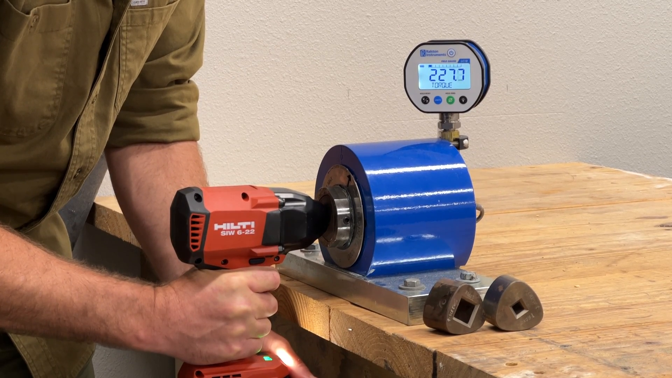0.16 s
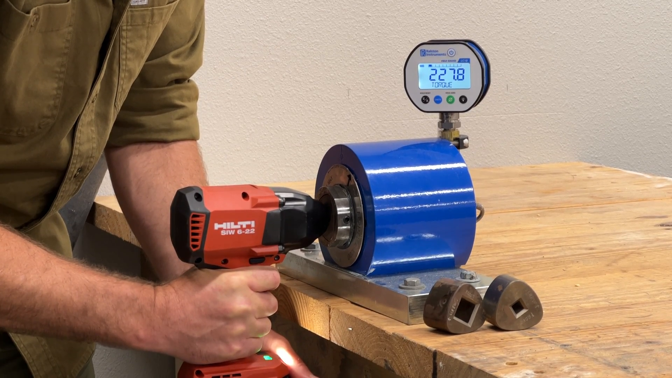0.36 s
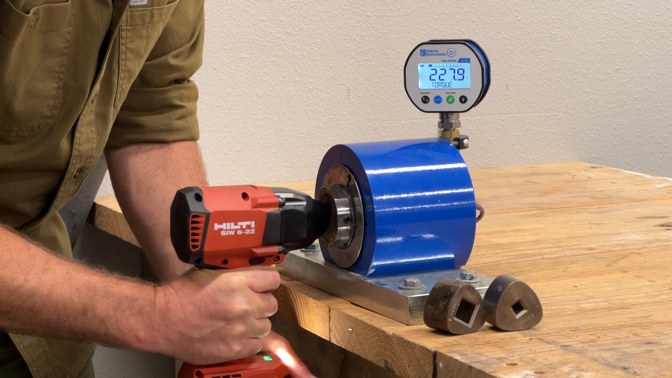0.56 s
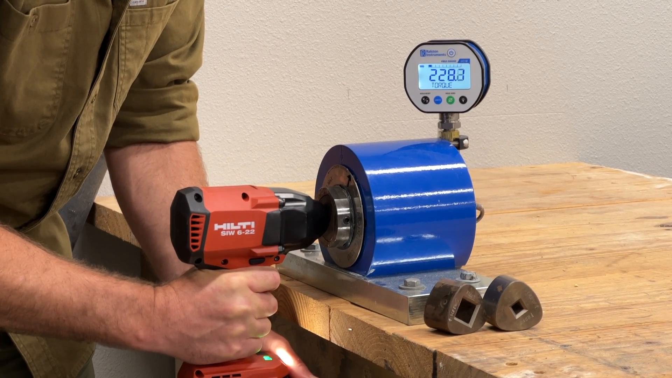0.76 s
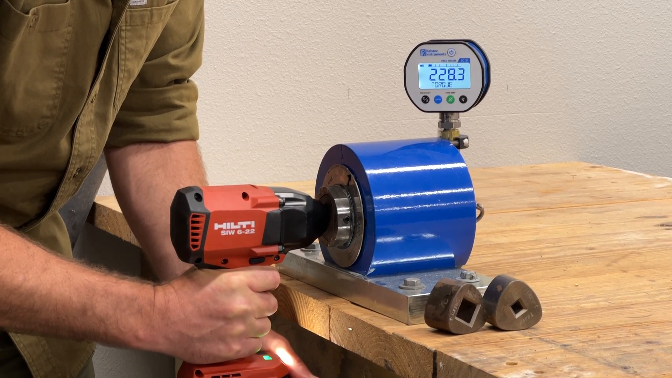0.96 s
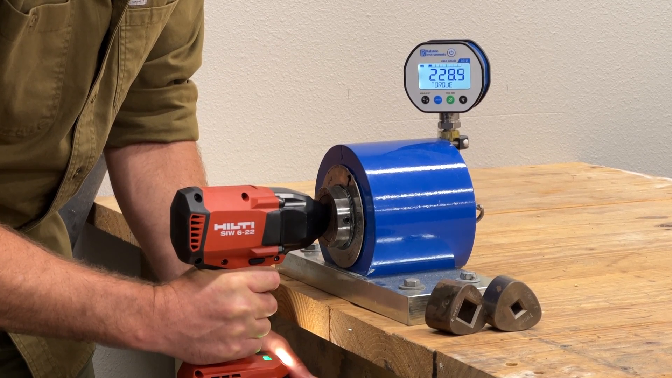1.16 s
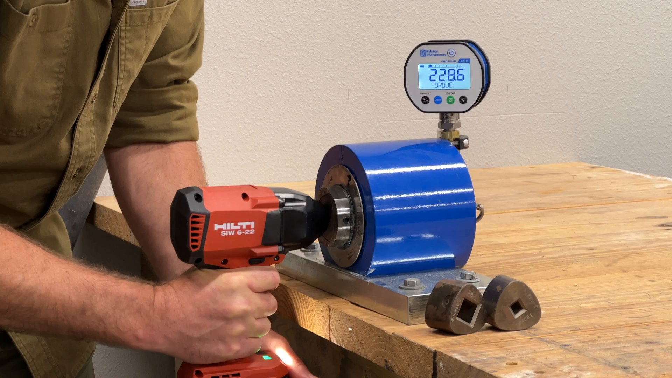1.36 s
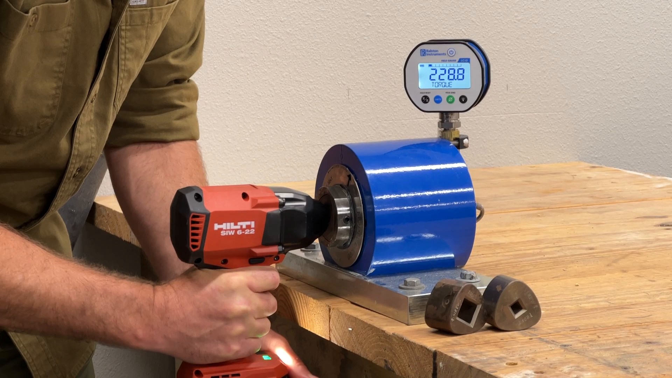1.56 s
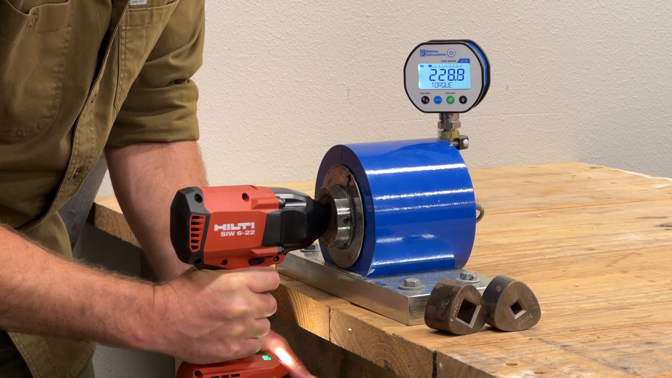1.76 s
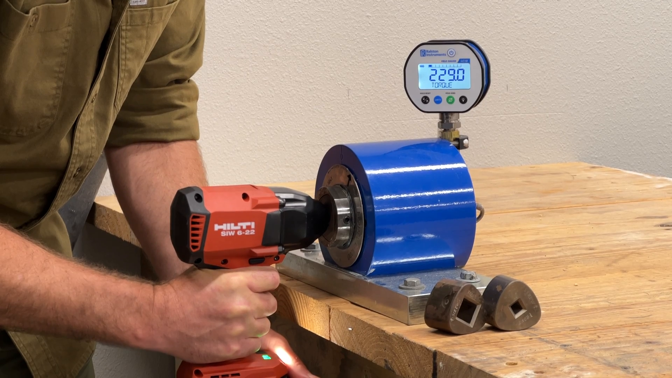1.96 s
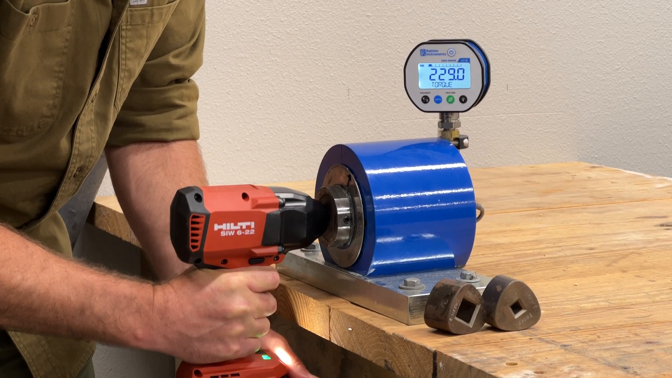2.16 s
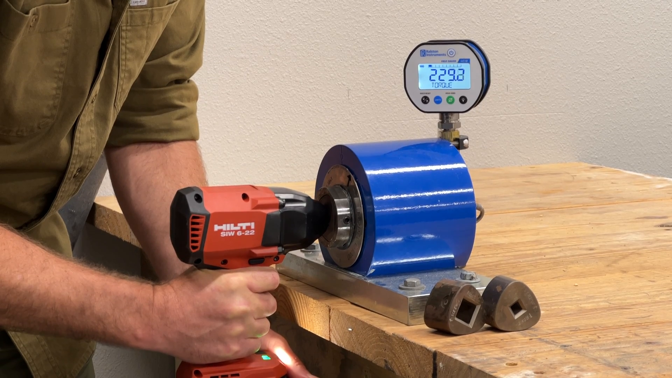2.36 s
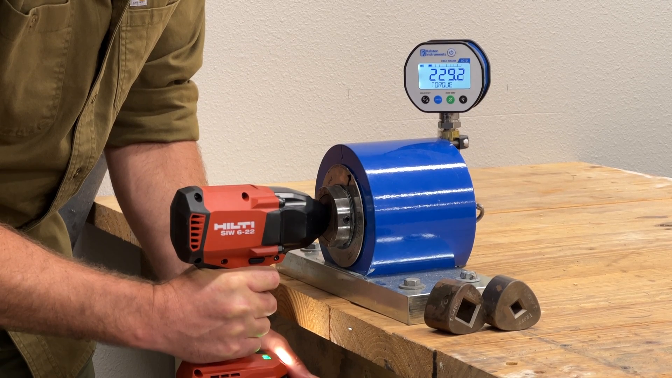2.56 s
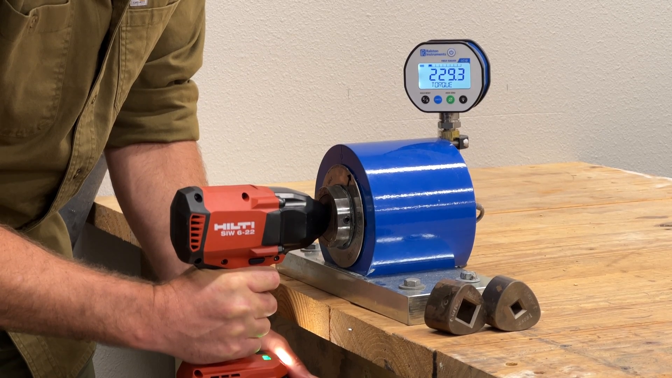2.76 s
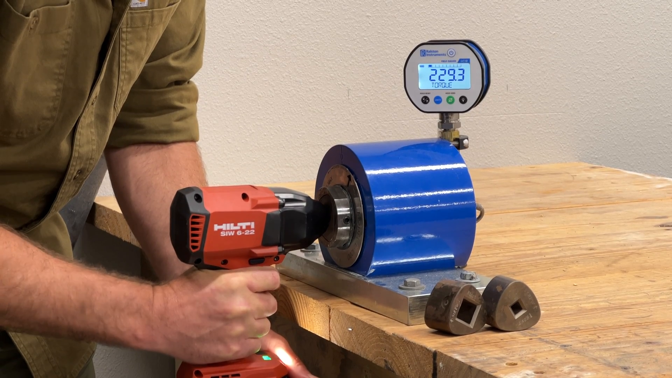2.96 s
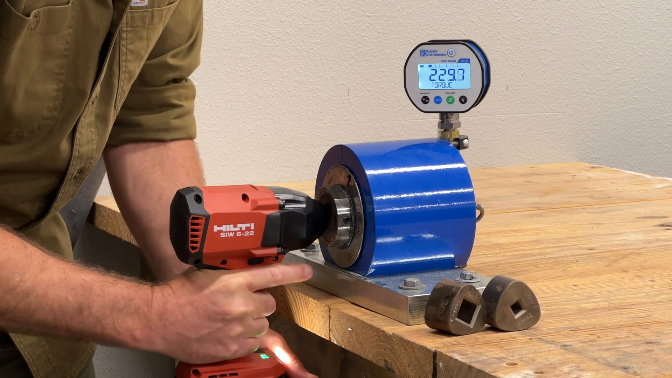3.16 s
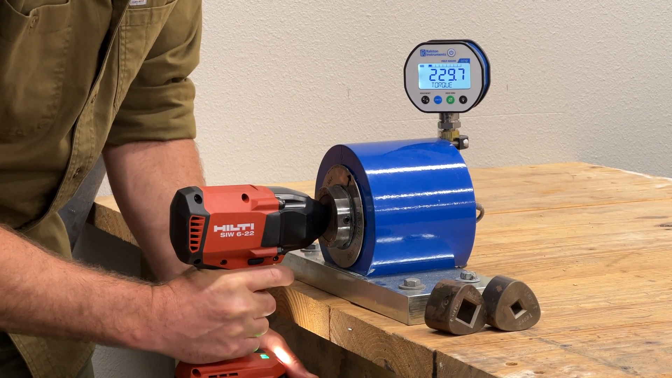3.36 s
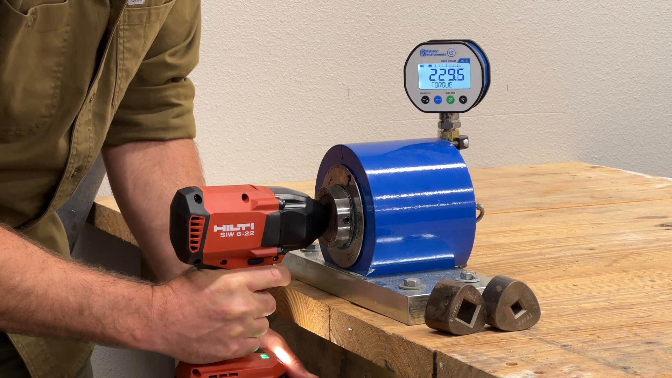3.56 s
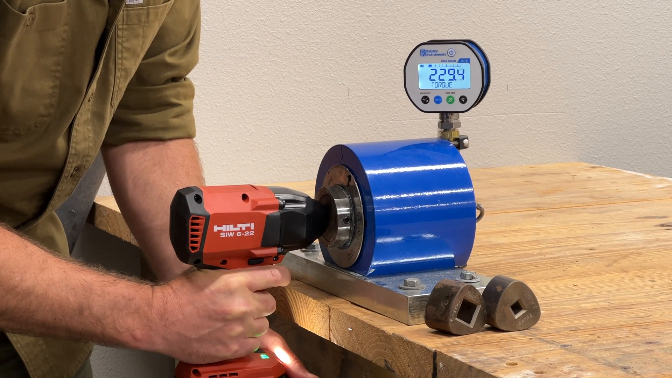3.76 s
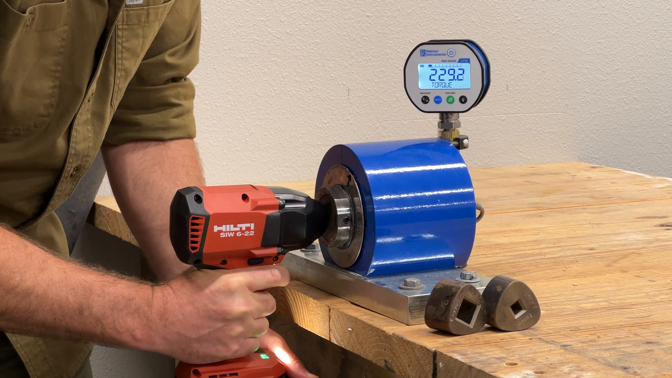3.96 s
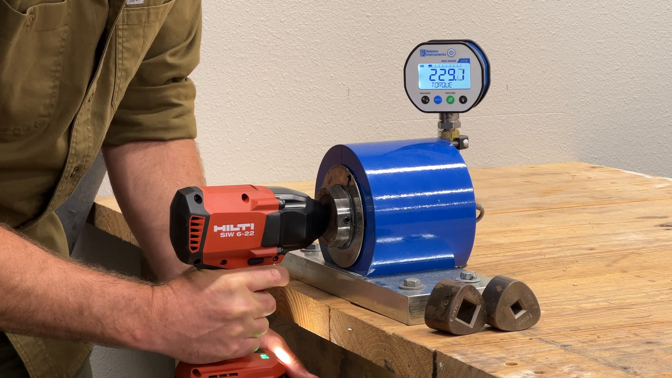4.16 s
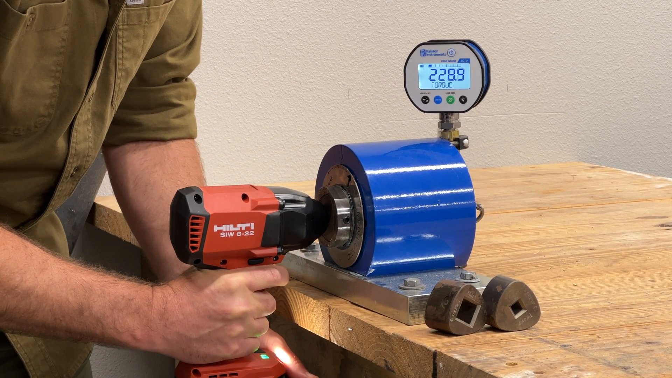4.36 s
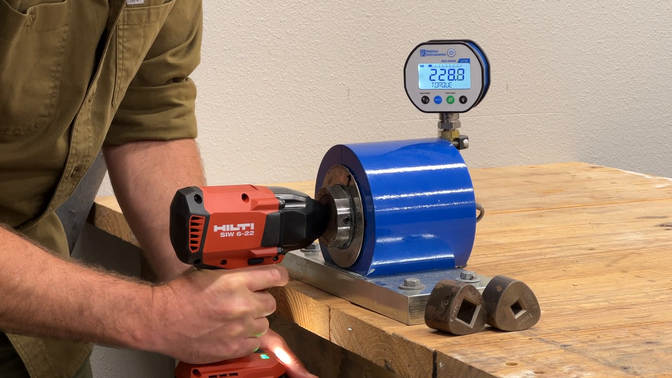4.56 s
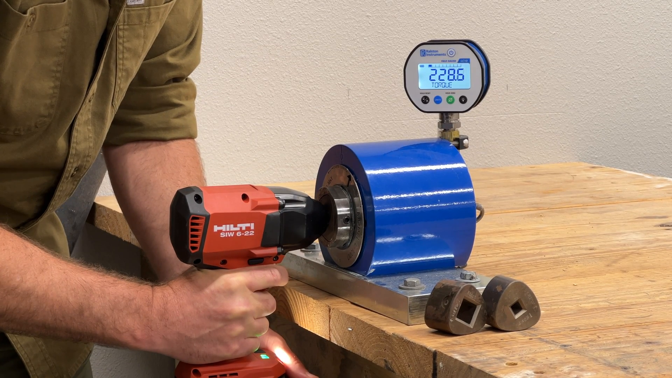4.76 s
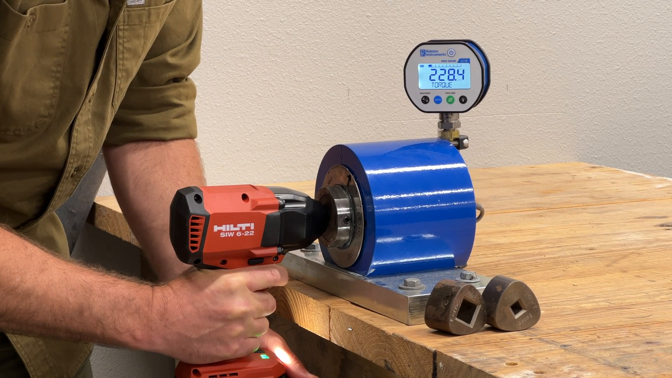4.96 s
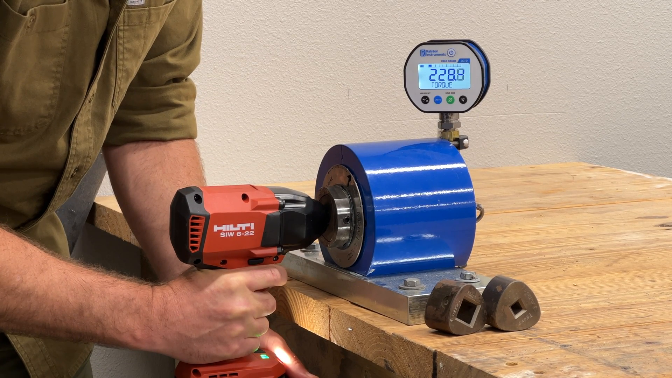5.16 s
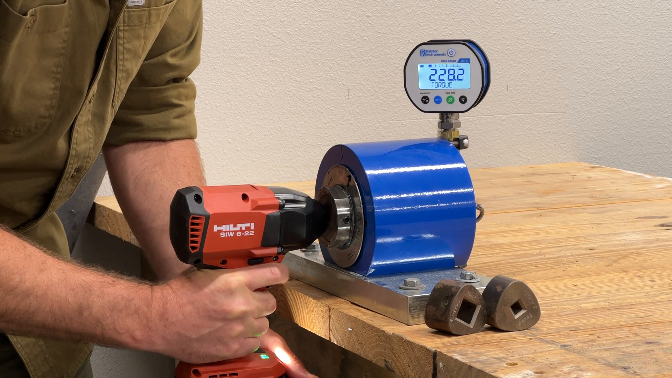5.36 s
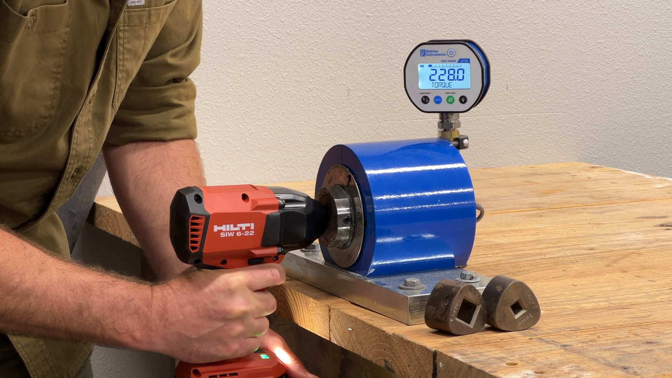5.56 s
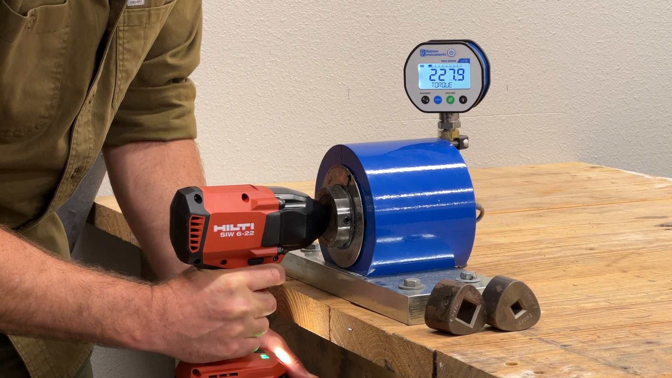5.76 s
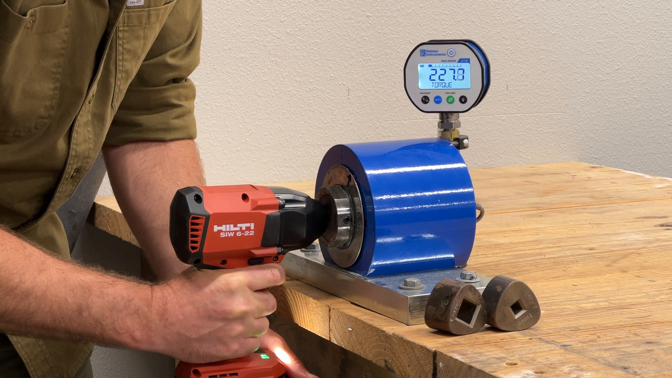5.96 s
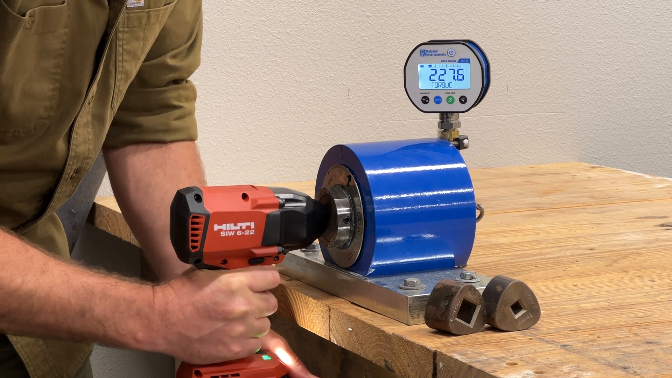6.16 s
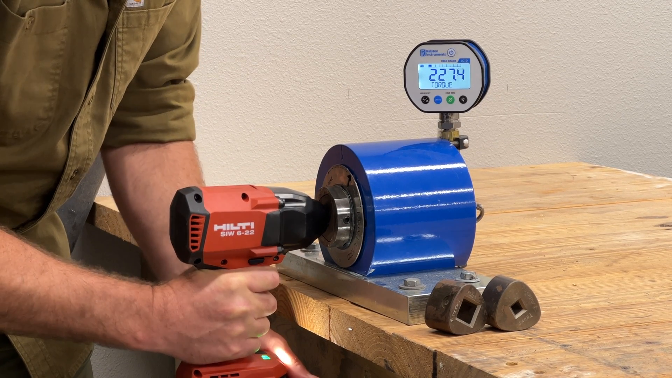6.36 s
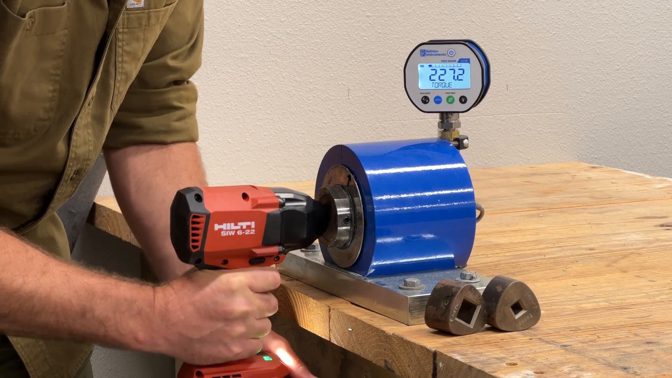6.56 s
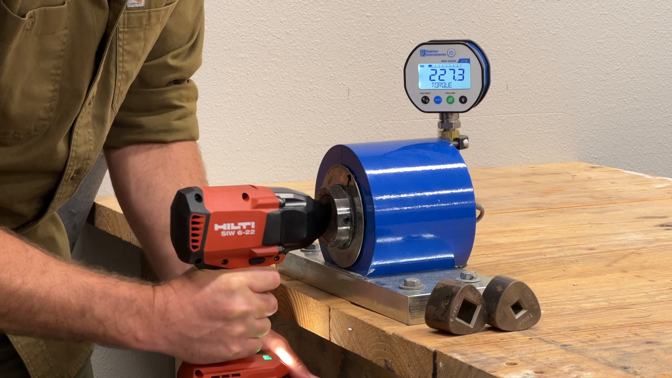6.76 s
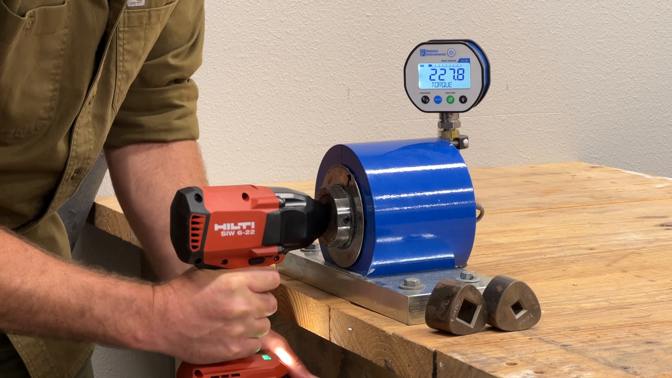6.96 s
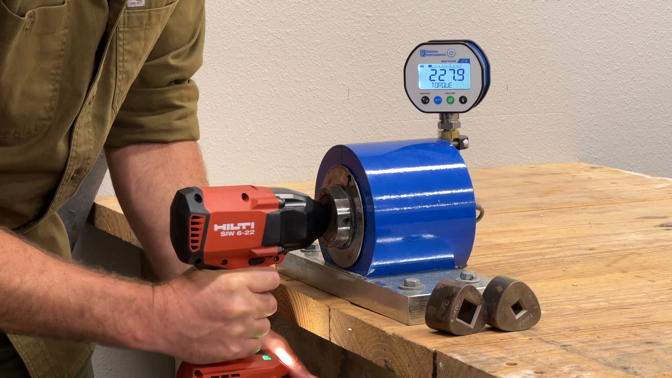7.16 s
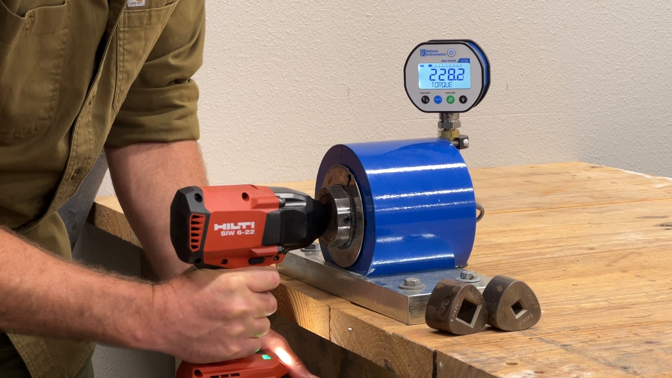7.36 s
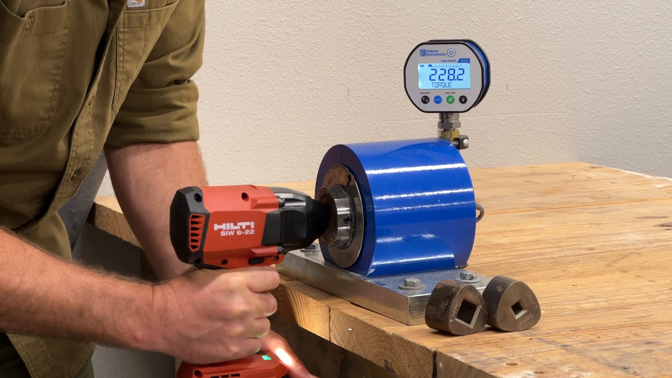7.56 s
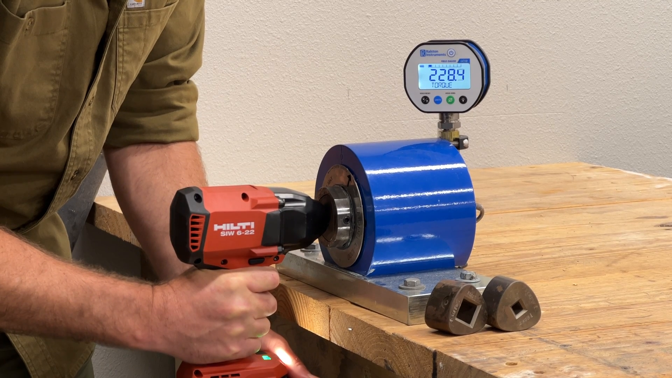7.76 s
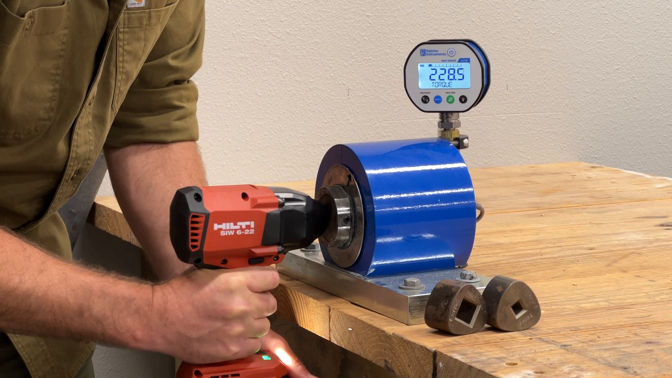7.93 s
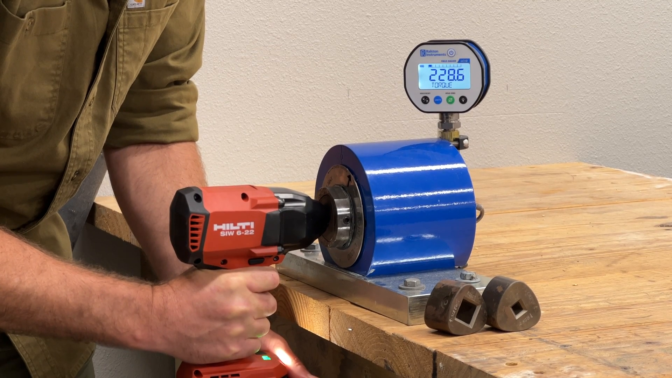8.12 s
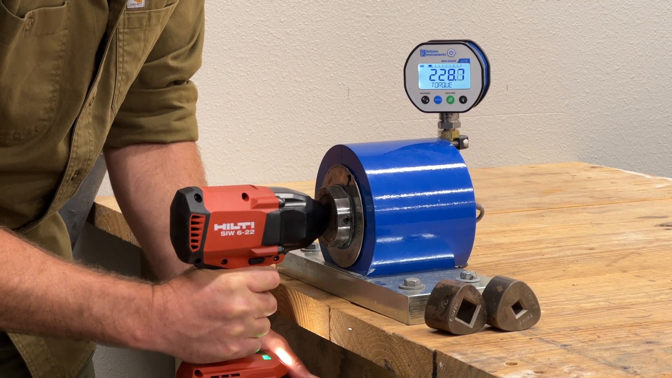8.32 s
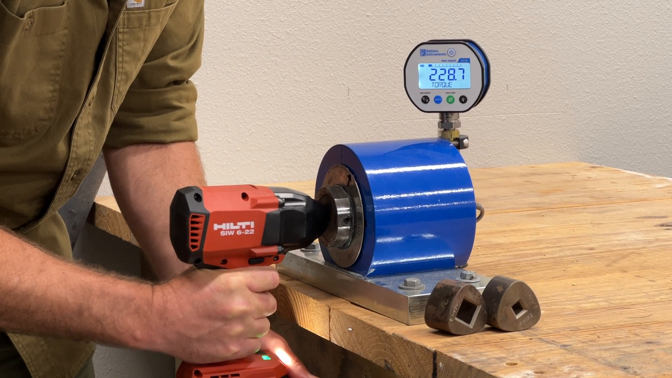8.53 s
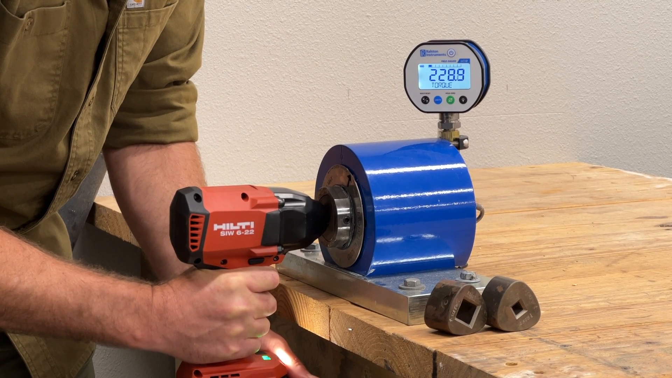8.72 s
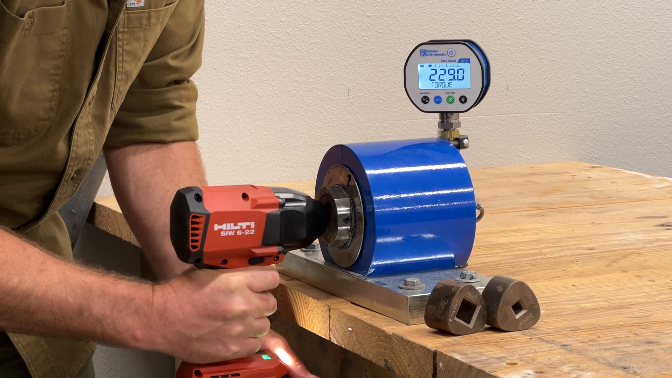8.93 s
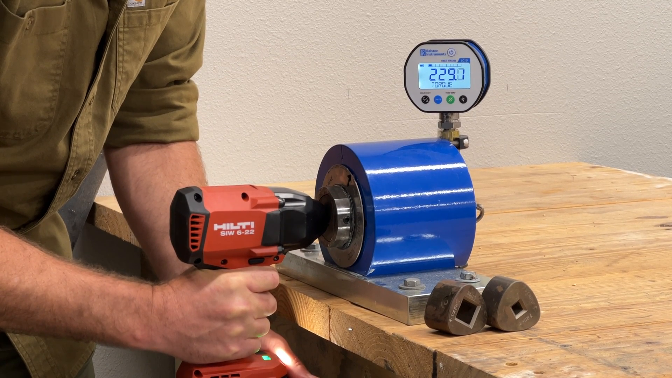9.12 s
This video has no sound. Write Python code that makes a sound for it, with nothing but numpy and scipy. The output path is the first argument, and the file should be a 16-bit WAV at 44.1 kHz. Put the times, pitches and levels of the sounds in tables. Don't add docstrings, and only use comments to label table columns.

```python
import sys
import numpy as np
from scipy import signal
from scipy.fft import rfft, irfft, next_fast_len
from scipy.io import wavfile
from scipy.ndimage import uniform_filter1d

SR = 44100
rng = np.random.default_rng(int(sys.argv[2]) if len(sys.argv) > 2 else 0)


def boost_factor(decibels):
    exponent = np.asarray(decibels, float) / 20
    return 10 ** exponent


def output_pcm(signal):
    pcm = np.clip(np.atleast_2d(signal).T, -1, 1) * 32767
    wavfile.write(sys.argv[1], SR, np.round(pcm).astype(np.int16))


N = 409688
FULL_RATE_HZ = 56.8
BRAKE_S, STALL_SHARE = .25, .32

# first counted blow in seconds, pulled in seconds, released in seconds,
# rate in blows per second, battery sag in blows per second per second.
BURSTS = [
    (-.0459, -1, 2.981, 56.835, .014),
    (6.1003, 6.1, 9.6, 56.986, .101),
]
# start in seconds, peak in dB,
# brightness in dB per octave, hall share in dB, ring in Hz.
CLICKS = [(3.5449, -62, 3, 6, 7000), (3.7674, -53, -5, 8, 6000), (3.797, -52.5, -4.5, 14, 3500),
          (4.231, -40, -5.5, -6, 1430), (4.2318, -46, -2.5, 4, 3300), (4.2414, -41, -7.5, 6.5, 3600),
          (4.251, -51, -4, -5, 700), (4.309, -47, -6, -2, 3800), (5.1374, -65, -3, 1, 2500),
          (6.022, -59, -3, 5, 2000), (6.0346, -34, -4, 1, 5900), (6.037, -44, -5, 15, 2900),
          (6.0436, -48, -1, -3, 9000), (6.064, -26.5, -4, 5, 2670), (6.0752, -23, -7, 5.5, 2060),
          (6.0894, -45, -4, 24.5, 1180)]


def evened(x):
    return x / np.sqrt(np.mean(x ** 2) + 1e-30)


def read(points, hz):
    f, value = np.transpose(points)
    return np.interp(np.log(hz + 1), np.log(f + 1), value)


def curve(rows, column):
    rows = np.asarray(rows)
    return np.interp(np.arange(N) / SR, rows[:, 0], rows[:, column])


def causal(gain_db):
    log_gain = np.maximum(gain_db, -100) * np.log(10) / 20
    full = np.r_[log_gain, log_gain[-2:0:-1]]
    spectrum = np.exp(np.conj(signal.hilbert(full)))
    taps = np.fft.ifft(spectrum).real[:len(gain_db)]
    return taps / np.linalg.norm(taps)


def mode(x, hz, width):
    pole = np.exp((2j * hz - width) * np.pi / SR)
    return 2 * signal.lfilter([1 - abs(pole)], [1, -pole], x).real


def train(times, sizes, size=0):
    at = np.round(times * SR).astype(int) + size
    keep = (at >= 0) & (at < N + size)
    return np.bincount(at[keep], sizes[keep], N + size)


def motor(t, burst):
    first, pulled, released = burst[:3]
    catch = 1 - .35 * np.exp(-np.maximum(t - pulled, 0) / .03)
    return catch * np.clip(1 - (t - released) / BRAKE_S, STALL_SHARE, 1)


def braking(t):
    return np.clip((t - BURSTS[0][2]) / BRAKE_S, 0, 1) * (t < BURSTS[1][0])


def force(t):
    first = t < BURSTS[1][0] - 1
    share = np.where(first, motor(t, BURSTS[0]), motor(t, BURSTS[1]))
    since = np.maximum(t - np.where(first, BURSTS[0][1], BURSTS[1][1]), 0)
    tightening_db = 0.04 * (since - 2)
    slow_db = 2 * np.minimum(2 * (1 - share), 1)
    seating_db = -3 * np.exp(-since / 0.28)
    return -37.5 + tightening_db + slow_db, -39 + 12 * np.log10(share) + seating_db


def blow_times(place):
    times, numbers = [], []
    for burst in BURSTS:
        first, _, released, rate, sag = burst
        last = min(released + BRAKE_S * (1 - STALL_SHARE), N / SR + .01)
        s = np.arange(first, last, 1e-4)
        blows_per_s = (rate - sag * (s - first)) * motor(s, burst)
        count = 1 + np.cumsum(blows_per_s) * 1e-4
        number = np.arange(1, count[-1] - place)
        times.append(np.interp(number + place, count, s))
        numbers.append(number)
    return np.concatenate(times), np.concatenate(numbers)


def cracks(spread_db=0.0, snap=3.3, chatter_db=-14, chatter_per_s=900):
    # place in the cycle from 0 to 1, level in dB,
    # timing scatter in ms, level change in dB while braking to a stop.
    rattle = [
        (0, 4, 0.12, -17.5),
        (.18, 5, .25, -3),
        (.3, 1.5, .2, 1),
        (0.438, 1.5, 0.45, -7),
        (.65, 0.5, .4, -11.5),
    ]
    # frequency in Hz, level in dB per Hz.
    steel = [(24, -58), (40, -14.5), (176, -14), (226, -27.5), (345, -9.5), (556, -14.5), (831, -13.5),
             (942, -14.5), (1410, -13.5), (2770, -11.5), (3300, -15), (4130, -8), (4930, -20),
             (5720, -17.5), (16000, -22)]
    # frequency in Hz, width in Hz, level in dB.
    rings = [(950, 150, -3.5), (1814, 390, 8), (2730, 740, 6), (4630, 520, 2), (5630, 730, 6.5),
             (7610, 400, 3)]
    # frequency in Hz, width in Hz, level in dB.
    slack_modes = [(577, 72, 24), (1850, 230, 15)]
    fizz_ms = 1.35

    kicks = np.zeros(N)
    for place, db, scatter_ms, braking_db in rattle:
        s = blow_times(np.clip(place, 0, .9))[0]
        chance = np.clip(rng.standard_normal((400, 2))[:len(s)], -2, 2)
        knock_db = db + spread_db * chance[:, 1] + braking_db * braking(s)
        kicks += train(s + scatter_ms / 1000 * chance[:, 0], boost_factor(knock_db))

    s = blow_times(0)[0]
    speed = np.interp(np.arange(N) / SR, s[1:], np.minimum(1 / np.diff(s) / FULL_RATE_HZ, 1))
    slowed = speed ** 2
    speed *= uniform_filter1d(kicks, 800) > 1e-6
    loose = boost_factor(chatter_db + 3.1 * np.minimum(rng.exponential(1, N), 3))
    kicks += (rng.random(N) < speed ** 4 * chatter_per_s / SR) * loose

    spit_envelope = signal.lfilter([1], [1, -np.exp(-1000 / (fizz_ms * SR))], kicks)
    spit = spit_envelope * rng.standard_normal(N)
    drive = spit + snap * kicks * rng.choice([-1, 1], N)
    drive *= boost_factor(1.0 + force(np.arange(N) / SR)[0]) / np.std(drive[:2 * SR])

    hz = np.fft.rfftfreq(8192, 1 / SR)
    rings_db = sum(db / (1 + (2 * (hz - f) / w) ** 2) for f, w, db in rings)
    rings_db += -5 / (1 + (hz / 1150) ** 6)
    slack = sum(boost_factor(db) * mode(drive * (1 - slowed), f, w) for f, w, db in slack_modes)
    heard = []
    for share in (1, .1):
        colour = causal(read(steel, hz) + share * rings_db)
        heard.append(signal.oaconvolve(drive, colour)[:N] + share * slack)
    return heard


def bench(orders):
    # frequency in Hz, delay in ms.
    delays = [(200, 4.5), (310, 8.5), (480, 6.8), (560, 9.5), (680, 1.5), (770, 5), (830, 1), (1050, 10)]
    hz = np.fft.rfftfreq(8192, 1 / SR)
    multiple, db = np.transpose(orders)
    gain_db = np.interp(hz / FULL_RATE_HZ, np.round(2 * multiple) / 2, db)
    octaves_above = np.maximum(np.log2(hz / FULL_RATE_HZ / multiple[-1] + 1e-9), 0)
    gain_db -= 22 * octaves_above + 20 * (hz < 25)
    lag = np.exp(-2j * np.pi * np.cumsum(read(delays, hz)) / 1000 * hz[1])
    response = irfft(rfft(causal(gain_db), 8192) * lag)[:4096]
    return response * np.sqrt(np.mean(boost_factor(2 * gain_db)))


def thuds(place=.345, spread_db=.8, scatter_ms=.05):
    # multiple of the full blow rate, level in dB.
    whole_orders = [(1, -21), (2, -17), (3, -12), (4, 0), (5, -6), (6, -15), (7, -12), (8, -6), (9, -9),
                    (10, -6), (11, -12), (12, -9), (13, -11), (14, -14), (15, -17), (16, -8), (17, -7),
                    (18, -14), (19, -18), (20, -12), (21, -16)]
    # multiple of the full blow rate, level in dB.
    half_orders = [(.5, -35), (1.5, -24), (2.5, -14), (3.5, -30), (5.5, -19), (6.5, -30), (9.5, -28),
                   (12.5, -30), (14.5, -34), (16.5, -25), (20, -34)]
    # time in seconds, level in dB.
    lugs = [(0, -6), (.6, -11), (1.5, -6), (2., 1.5), (2.9, 4.5), (3.06, 1.5), (6.09, -3), (6.4, 3.5),
            (7.2, -0.5), (8.2, 0), (8.55, 0), (9.29, -14)]
    lead = 4096

    s, number = blow_times(place)
    chance = rng.standard_normal((400, 4))[:len(s)]
    s = s + scatter_ms / 1000 * chance[:, 0]
    size = boost_factor(force(s)[1] - 1.0) * SR / FULL_RATE_HZ / np.sqrt(2)
    even = train(s, size * boost_factor(spread_db * chance[:, 1]), lead)
    lug_db = np.interp(s, *np.transpose(lugs)) + 4.2 * chance[:, 2]
    odd = train(s + 0.00391, size * (-1) ** number * boost_factor(lug_db), lead)
    response = bench(whole_orders)
    direct = signal.oaconvolve(even, response) + signal.oaconvolve(odd, bench(half_orders))
    scrambled = train(s, size * np.sign(chance[:, 3]))
    return direct[lead:][:N], signal.oaconvolve(scrambled, response)[:N]


def lingering(thud_feed):
    # frequency in Hz, width in Hz, level in dB.
    tones = [(141.5, 1.7, 19.5), (225, 2.4, 15), (579, 3.4, 14.5)]
    freed = thud_feed * np.minimum(5 * braking(np.arange(N) / SR), 1)
    return sum(boost_factor(db) * mode(freed, hz, width) for hz, width, db in tones)


def spin_up():
    # time in seconds, level in dB.
    whine_level = [
        (6.036, -67),
        (6.044, -46.5),
        (6.064, -49),
        (6.1, -48),
        (6.13, -75),
    ]
    t = np.arange(N) / SR
    whine = mode(mode(rng.standard_normal(N), 2700, 1500), 2700, 1560)
    sounding = (t > whine_level[0][0]) * (t < whine_level[-1][0])
    return boost_factor(curve(whine_level, 1)) * evened(whine) * sounding


def clicks():
    ring_cycles = 9
    direct, feed, t = np.zeros(N), np.zeros(N), np.arange(1025) / SR
    hz = np.fft.rfftfreq(2048, 1 / SR)
    for s, db, tilt_db, hall_db, ring_hz in CLICKS:
        slope_db = tilt_db * np.log2(hz / 2000 + 0.028) - 20 * np.log10(1 + (350 / (hz + 1)) ** 2)
        colour = causal(slope_db + 8.3 / (1 + (4.3 * (hz / ring_hz - 1)) ** 2))
        burst = (rng.standard_normal(len(t)) + 2 * (t == 0)) * np.exp(-t * ring_hz / ring_cycles)
        tick = np.convolve(burst, colour)[:len(t)]
        size = boost_factor(db) / abs(tick).max()
        at = round((s + .0008) * SR)
        direct[at:at + len(t)] += size * tick
        feed[at:at + len(t)] += boost_factor(hall_db) * size * np.linalg.norm(tick) * colour
    return direct, feed


def bumps(cycles=1.2):
    # start in seconds, level in dB, frequency in Hz.
    pushes = [
        (3.145, -46, 60),
        (3.585, -60, 35),
        (4.265, -60, 50),
        (4.47, -77, 45.1),
    ]
    out, t = np.zeros(N), np.arange(8000) / SR
    for s, db, hz in pushes:
        u = t * hz / cycles
        swell = 4 * u * np.exp(-2 * u)
        out[round(s * SR):][:len(t)] += boost_factor(db) * swell * np.sin(2 * np.pi * hz * t)
    return out


def hall(changing, steady, gap_ms=6.0):
    # frequency in Hz, reverberation time in seconds.
    decay = [(100, 1.3), (260, 1.72), (700, 1.73), (1400, 1.8), (2500, 1.16), (4200, 1.6), (6000, 1.2),
             (9000, 0.8), (11500, 0.8), (15000, 0.2)]
    # frequency in Hz, level in dB.
    wall_colour = [(60, -4.5), (150, -8.5), (300, -7), (600, -4), (1300, -2), (1850, -3), (2500, -4.5),
                   (4200, -9.5), (5700, -2.5), (9000, -13), (15000, -8)]
    size = next_fast_len(len(steady) + 2 * SR)
    out, turn = 0, np.arange(len(steady)) / SR * 2.3 * np.pi
    at = np.arange(round(gap_ms * SR / 1000), 2 * SR - 20, 10)
    for k in range(4):
        taps = np.zeros(2 * SR)
        taps[at + rng.integers(0, 10, 9000)[:len(at)]] = rng.choice([-1., 1.], 9000)[:len(at)]
        hz, t, z = signal.stft(taps, SR, nperseg=256)
        haste = 1.35 if k == 3 else 1
        fall = boost_factor(-60 * t / read(decay, hz)[:, None] * haste)
        tail = signal.istft(z * fall, SR, nperseg=256)[1][:2 * SR]
        sent = steady if k == 3 else changing * np.cos(turn + k * np.pi / 3) * np.sqrt(2 / 3)
        out = out + rfft(sent, size) * rfft(tail, size) / np.linalg.norm(tail)
    colour = boost_factor(read(wall_colour, np.fft.rfftfreq(size, 1 / SR)))
    return irfft(out * colour, size)[:len(steady)]


def air():
    # frequency in Hz, level in dB per Hz.
    air_colour = [(15, -27), (25, -14.5), (105, -20.5), (141, 0.5), (223, -13), (263, -4.5), (309, -11.5),
                  (405, -8.5), (545, -15.5), (677, -16), (1610, -32), (14400, -35.5), (16000, -58)]
    # time in seconds, air level in dB.
    gate = [
        (3.3, -59),
        (3.45, -74),
        (3.75, -75),
        (4.05, -66),
        (4.3, -62),
        (4.8, -64),
        (5.51, -62),
        (5.69, -72),
        (6.01, -79),
    ]
    hum_hz = 394.4

    frames, hz = N // 256 + 5, np.fft.rfftfreq(1024, 1 / SR)
    a, b, patches = rng.standard_normal((frames, 513, 3)).T
    patches = evened(uniform_filter1d(uniform_filter1d(patches, 4, 0), 10, 1))
    shaped = (a + 1j * b) * boost_factor(read(air_colour, hz))[:, None]
    low = 1 / (1 + (hz / 2500) ** 4)[:, None]
    lumpy = shaped * low * boost_factor(2.5 * patches)
    smooth = shaped * (1 - low) * boost_factor(-4.0 * (hz / 14000) ** 4)[:, None]
    rumble, hiss = [evened(signal.istft(z, nperseg=1024, noverlap=768)[1][:N]) for z in (lumpy, smooth)]
    hum = evened(mode(rng.standard_normal(N), hum_hz, 17.0))
    hum = evened(hum + 2 * np.sin(2 * np.pi * hum_hz * np.arange(N) / SR))

    wake_db, wake_share, wake_s = -89, 0.46, .15
    s, db = np.transpose(CLICKS)[:2]
    openings = train(s, boost_factor(2 * wake_share * (db + 45.5)))
    wake = signal.lfilter([1], [1, -np.exp(-1 / (wake_s * SR))], openings) ** .5
    gate_db = curve(gate, 1)
    air_gain = boost_factor(gate_db) + boost_factor(wake_db + 12.5) * wake ** 2 / (1 + wake)
    hiss_gain = boost_factor(-87 + 1.1 * (gate_db + 64)) + boost_factor(wake_db) * wake
    return air_gain * rumble + boost_factor(gate_db - 6) * hum + hiss_gain * hiss


def scene():
    crack, crack_feed = cracks()
    thud, thud_feed = thuds()
    click, click_feed = clicks()
    feeds = crack_feed + boost_factor(-8) * thud_feed, click_feed
    primed = [np.r_[x[:SR], x] for x in feeds]
    tool = crack + thud + click + lingering(thud_feed) + bumps() + spin_up()
    return (tool + hall(*primed)[SR:] + air())[None]


def low_pass(x):
    return signal.sosfilt(signal.butter(12, 16830, fs=SR, output="sos"), x)


def record(dry):
    knee, edge_hz = .11, 15830
    rounded = knee * np.tanh(dry / knee)
    lowpass = signal.firwin(801, edge_hz, window=("kaiser", 9), fs=SR)
    return low_pass(signal.oaconvolve(rounded, lowpass[None], "same"))


dry = scene()
out = record(dry)
output_pcm(out)
```